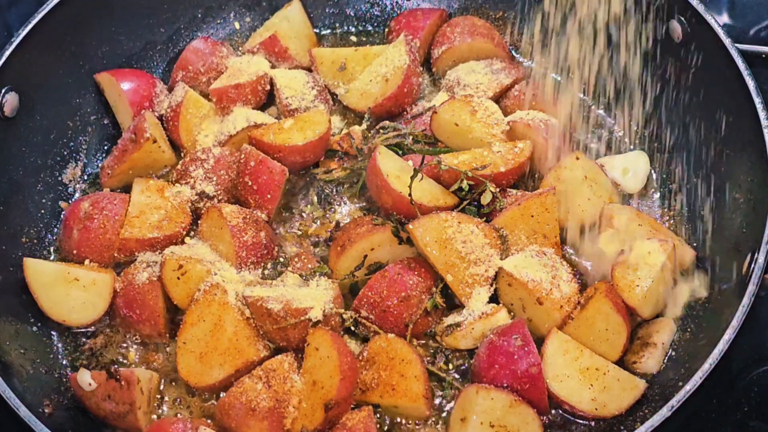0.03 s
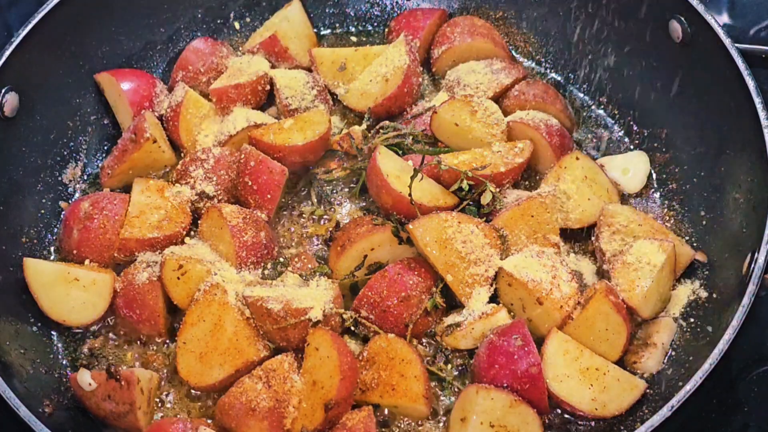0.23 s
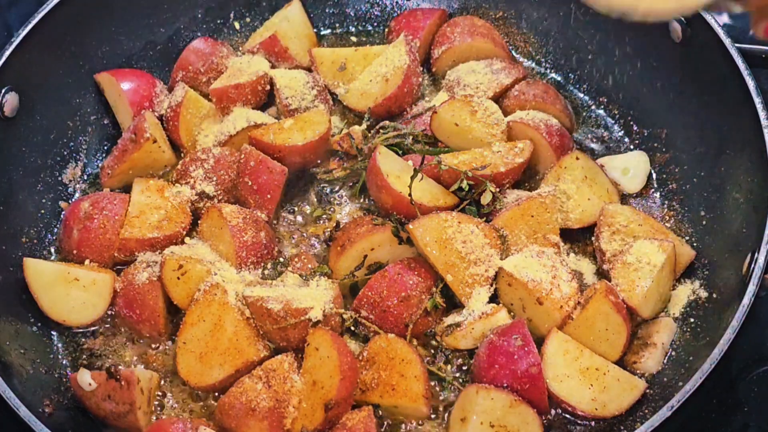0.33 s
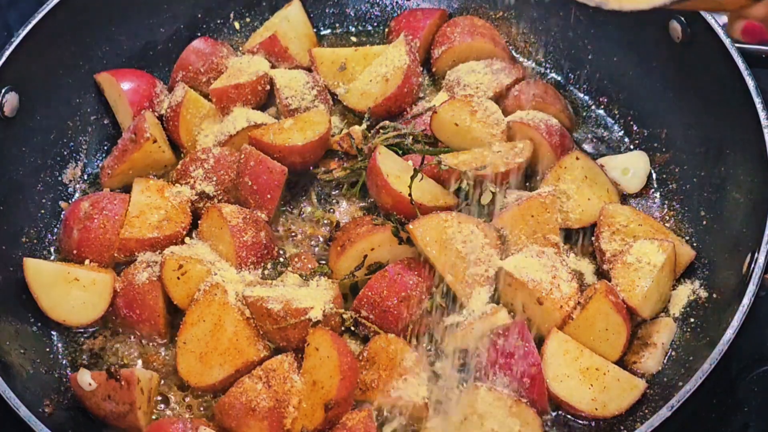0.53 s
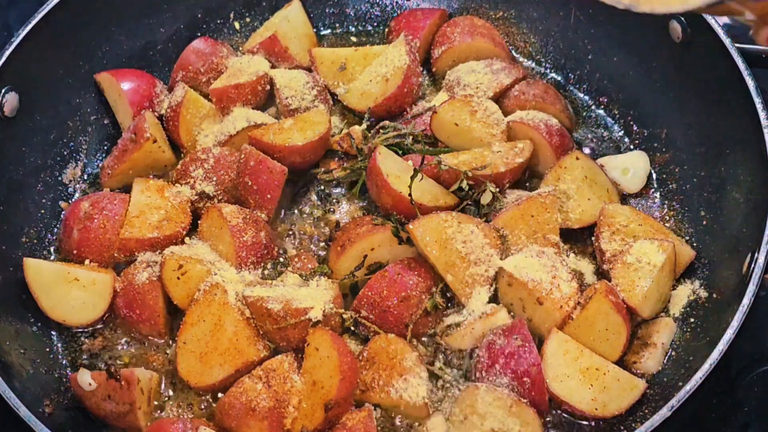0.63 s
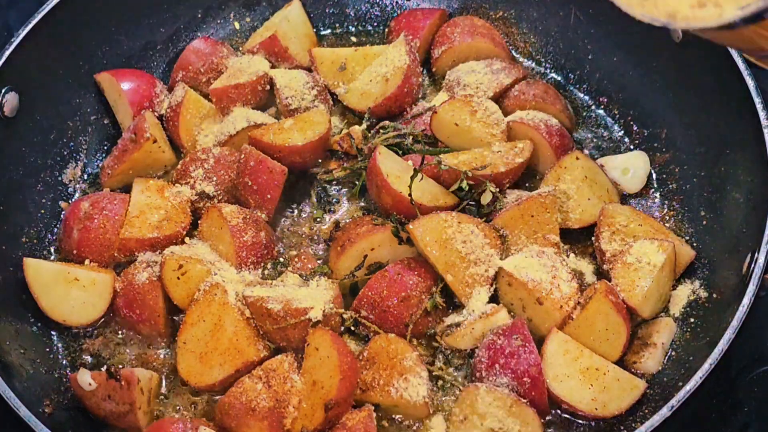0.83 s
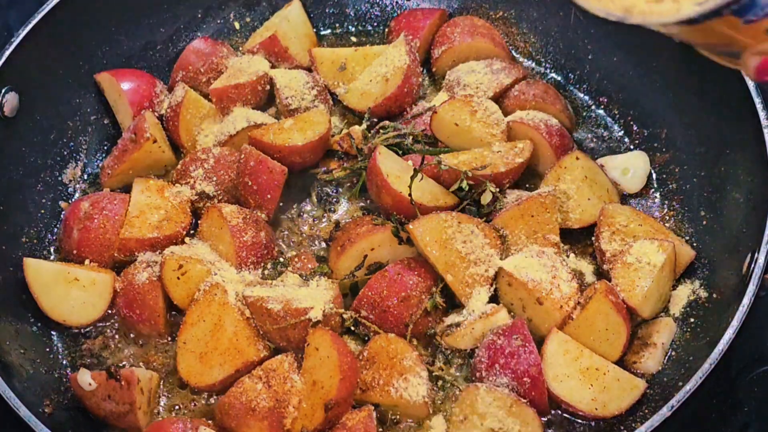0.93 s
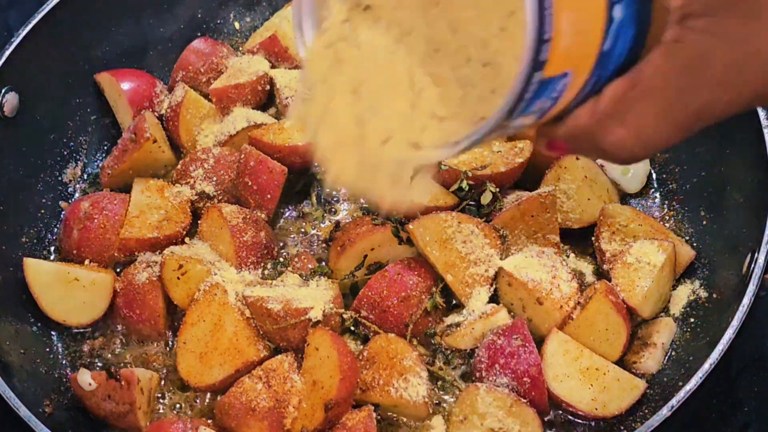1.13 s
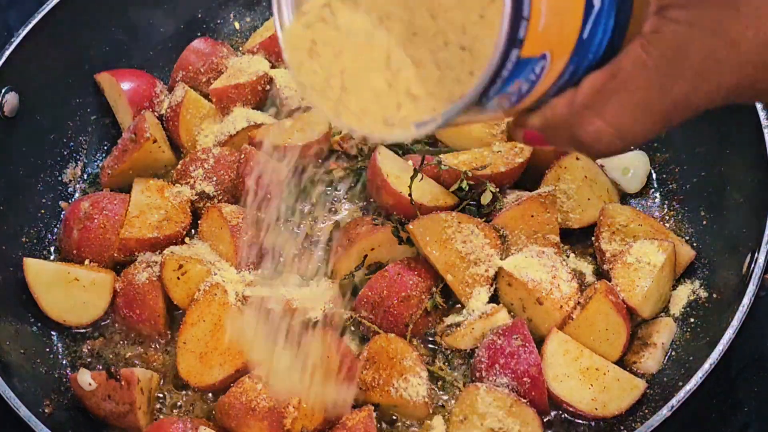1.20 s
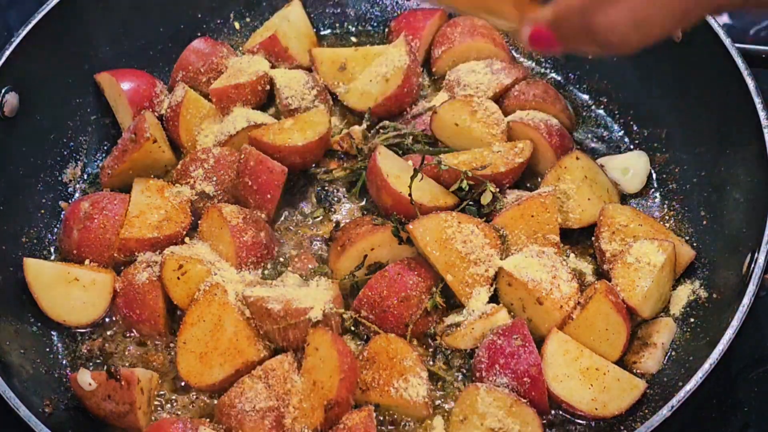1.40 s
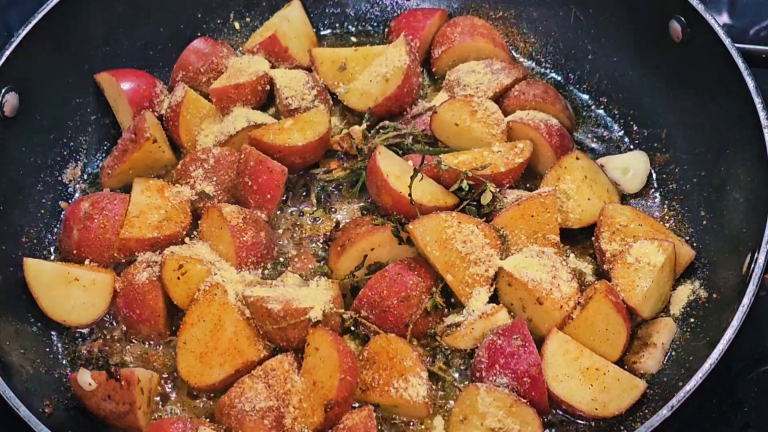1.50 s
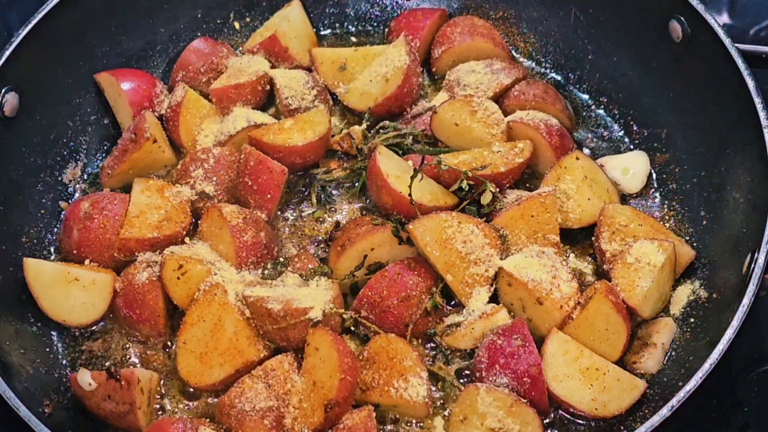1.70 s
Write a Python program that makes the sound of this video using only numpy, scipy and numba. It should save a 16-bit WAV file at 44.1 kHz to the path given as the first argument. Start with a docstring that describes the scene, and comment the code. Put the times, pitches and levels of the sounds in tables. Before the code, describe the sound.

A canister of dry seasoning gets a sharp shake, then rustling, rattling grains in a small kitchen

```python
"""A canister of granular seasoning is shaken close by in a small kitchen: a hard shake, then rattling.
The shake slams the load into the canister and rings its modes, and a weaker knock follows. Sliding
grains are clumped impact noise through steady and drifting resonances; ticks and bumps are short
bursts of filtered noise. A dense decaying noise tail gives the room, over faint tone and a low drone."""
import sys
import numpy as np
from scipy import signal
from scipy.fft import rfft, irfft, next_fast_len
from scipy.io import wavfile
from numba import njit

SR = 44100
rng = np.random.default_rng(int(sys.argv[2]) if len(sys.argv) > 2 else 0)


def store_pcm(level_fs):
    """Save levels as 16-bit WAV."""
    pcm = np.round(np.clip(level_fs, -1, 1) * 32767).astype(np.int16)
    wavfile.write(sys.argv[1], SR, np.atleast_2d(pcm).T)


N = 77175
T = np.arange(N) / SR
SIZE = 2 * next_fast_len(N // 2 + 4096)  # padded FFT length
FREQ_HZ = np.maximum(np.fft.rfftfreq(SIZE, 1 / SR), 1)

# Room tone. Each row: centre in Hz, width in Hz, relative level in dB.
ROOM_TONE = [(301, 59, 4.5), (470, 50, 1), (920, 1000, -9)]
# Low drone. Each row: centre in Hz, width in Hz, relative level in dB.
DRONE = [(101, 11, -1), (137, 50, -12.5), (59, 49, -18)]
# Dull bumps of the hand and the shifting load.
# Each row: peak in seconds, nominal rise and fall in seconds, centre in Hz, level in dB.
BUMPS = [(0.246, 0.013, 0.041, 125, -35.5), (.24, 0.0094, 0.043, 380, -27), (0.313, 0.05, 0.04, 310, -30),
         (.33, 0.023, .02, 146, -40), (0.529, 0.023, 0.047, 100, -36), (.68, 0.034, 0.023, 83, -43),
         (.93, 0.026, .02, 104, -49.5), (1.07, 0.0098, 0.038, 97, -44), (1.088, 0.041, 0.036, 285, -43.5),
         (1.22, 0.012, 0.025, 119, -46), (1.293, 0.016, 0.047, 148, -37), (1.4, 0.022, 0.031, 170, -49),
         (1.51, 0.089, 0.079, 105.5, -47), (1.745, 0.026, .03, 111, -40.5)]
# Single hard grains. Each row: start in seconds, level in dB before TICK_TRIM_DB, brightness in Hz.
TICKS = [(0.0373, -13, 10000), (0.109, -2, 11000), (0.114, -11, 10100), (0.176, -20, 6050),
         (0.2134, 9, 9500), (.5465, -16, 4500), (.5585, -4, 4100), (0.677, 2, 4800), (0.6953, -2, 4470),
         (0.732, -2, 3000), (1.079, -3, 8900), (1.15, 2, 9500), (1.307, -4.5, 9050)]
# Load slams into the canister, then slumps back.
# Each row: start in seconds, level in dB, treble roll-off in Hz.
KNOCKS = [(0.2134, -9, 5000), (.279, -19, 1320)]
# Modes of the knocked canister. Each row: frequency in Hz, relative level in dB.
MODES = [(308, -11.5), (460, -9.5), (492, -13), (751, 1), (818, -4), (954, -4), (1161, 3), (1320, -5.5),
         (1699, 1.5), (1788, -19), (1960, -10), (2115, -16), (2234, -8), (2368, -3.5), (2432, -9.5),
         (3033, -9)]
# Slides of the load. Each row: peak in seconds, nominal rise and fall in seconds, then drive in dB
# of hollow, cavity, rasp, scrape, wall, sizzle, hiss, air.
SLIDES = [ (0.019, 0.13, 0.019, -38.5, -27, -39, -38.5, -38, -28, -31, -49),
          (0.073, 0.02, 0.1, -35, -27.5, -35, -30, -21.5, -21, -31.5, -44),
          (0.114, 0.011, 0.041, -38, -22.5, -30.5, -27.5, -37, -19.5, -29.5, -32),
          (.18, .01, 0.075, -55, -28, -45, -25, -40, -31, -40, -42),
          (0.221, 0.007, 0.032, -4, 6, 0, -9, -17, -5, -6, -22.5),
          (0.298, 0.022, 0.041, -9, -7.5, -6.5, -25.5, -11.5, -21, -23, -39),
          (.40, 0.049, 0.049, -21, -13.5, -33, -32, -21.5, -47, -30, -65),
          (0.497, 0.049, 0.033, -11, -3.5, -16, -35.5, -21.5, -26.5, -33, -46),
          (0.563, 0.017, 0.036, -19, -5.5, -8.5, -22, -11.5, -21.5, -26, -41),
          (0.641, 0.047, 0.04, -18, -11, -15, -21, -13, -23, -29, -41),
          (.69, 0.016, 0.054, -16.5, -9, -12, -16, -14, -21.5, -21, -41),
          (0.832, 0.14, 0.16, -27.5, -17, -21, -28.5, -31, -27, -26.5, -43),
          (.98, 0.057, 0.023, -24, -9.5, -23, -50, -45, -15, -35, -44),
          (1.098, 0.091, 0.094, -20, -8.5, -13.5, -21.5, -41, -9, -14.5, -26),
          (1.206, 0.028, 0.026, -20, -11, -29, -27.5, -22, -15.5, -20.5, -21.5),
          (1.265, 0.035, 0.027, -42, -11, -37, -29.5, -26, -23, -28, -25),
          (1.311, 0.036, 0.046, -37, -11, -37.5, -28.5, -18, -13, -30, -32),
          (1.44, .07, 0.064, -37.5, -10, -35.5, -37, -22.5, -17.5, -44, -36),
          (1.518, 0.037, 0.067, -28.5, -6, -21, -37.5, -28, -12.5, -36, -36),
          (1.619, 0.051, 0.098, -23.5, -8.5, -21.5, -39, -52, -26, -27, -36),
          (1.74, 0.057, .05, -21, -12, -14, -32, -51, -21.5, -30, -29)]
# Steady resonances excited by the grains, by register.
# Each row: centre in Hz, width in Hz, relative level in dB.
HOLLOW_MODES = [(525, 93, -5.5), (642, 92, -10), (750, 36.7, 4.5), (941, 72, 1), (1185, 250, -11)]
RASP_MODES = [(2128, 165, -1), (2460, 280, -5.5), (2904, 320, -3)]
SCRAPE_MODES = [(3910, 500, 1), (4840, 810, 1), (5640, 1060, -2.5), (6200, 340, -2.5)]
HISS_MODES = [(7790, 970, -0.5), (9000, 850, 0.5), (11300, 530, -7)]
AIR_MODES = [(12940, 3100, 0.81), (13700, 910, -1.6)]
# Narrow steady resonances, chiefly near 1.7 kHz, singing under the rattle.
# Each row: centre in Hz, width in Hz, relative level in dB.
SINGING_RESONANCES = [(1699, 39.2, -1), (1593, 35, -7), (975, 60, -20)]
# Resonances drifting as the canister tilts and the load shifts.
# Each row: time in seconds, cavity centre in Hz, wall centre in Hz, sizzle centre in Hz.
TILT_DRIFT = [(0, 1750, 4180, 10200), (.14, 1766, 4160, 10250), (.26, 1688, 4290, 9460),
              (.5, 1700, 4140, 9970), (0.554, 1650, 4050, 9640), (0.599, 1670, 5260, 9630),
              (0.782, 1708, 5060, 9060), (1.1, 1602, 4950, 9460), (1.27, 1614, 4650, 9520),
              (1.34, 1605, 4990, 9000), (1.44, 1472, 5230, 9530), (1.53, 1670, 5070, 9300),
              (1.75, 1526, 5070, 9500)]
# Air space above the load, changing as it pours.
# Each row: time in seconds, hollow centre in Hz, rasp centre in Hz.
AIR_SPACE_DRIFT = [(0, 726, 2590), (.17, 704, 2680), (.23, 810, 2290), (.3, 840, 2110), (.45, 654, 2050),
                   (0.501, 720, 2190), (.57, 530, 2160), (.66, 634, 2240), (0.718, 664, 2640),
                   (.82, 540, 2620), (.98, 730, 2680), (1.1, 566, 2920), (1.23, 560, 3000),
                   (1.42, 700, 2280), (1.541, 630, 2000), (1.62, 790, 2800), (1.75, 620, 2980)]

ROOM_TONE_DB, DRONE_DB, DRONE_START_S = -60, -54.5, 0.181
ROOM_T60_S, ROOM_DB, ROOM_GAP_S = 0.098, -10.5, 0.0032
BUMP_WIDTH_RATIO = 0.42  # share of the centre frequency
TICK_DECAY_S, TICK_TRIM_DB = 0.0016, -3  # decay to 1/e
TICK_WIDTH_RATIO, TICK_TOP_HZ = 0.38, 11000  # width as a share of the brightness
RING_T60_S, RING_SLOPE = 0.175, 0.4  # T60 at 1 kHz, shorter for higher modes
KNOCK_RISE_CYCLES = 7.7
CHATTER_PER_S, CHATTER_DB = 120, 5.5  # loose grains make the ring uneven
GRAINS_PER_S, GRAIN_SPREAD_DB, DUST_DB = 5700, 3.0, -3  # dust: finest powder under the grains
CLUMPS_PER_S, CLUMP_DB = 170, 1.5
STEADY_DB = -4.5  # steady hollow and rasp under the drifting ones
SINGING_DB = -3
CAVITY_WIDTH_HZ, WALL_WIDTH_HZ, SIZZLE_WIDTH_HZ = 230, 430, 1140
HOLLOW_WIDTH_HZ, RASP_WIDTH_HZ = 229, 417
TOP_HZ = 15700


def amp(db):
    """Decibels to gain."""
    return 10 ** (np.asarray(db) / 20)


def unit(x):
    """Scale to standard deviation 1."""
    return x / np.std(x)


def noise():
    """White noise over the whole scene."""
    return rng.standard_normal(N)


def flutter(rate_per_s):
    """Random wobble: straight lines between random values drawn at the given rate."""
    return np.interp(T * rate_per_s, np.arange(N), noise())


def swell(peak_s, rise_s, fall_s, power=1.96):
    """Near-Gaussian envelope that rises to a peak and dies away."""
    spread_s = np.where(T < peak_s, max(rise_s, 0.002) * 0.8, max(fall_s, 0.002) * 0.85)
    return np.exp(-0.5 * (np.abs(T - peak_s) / spread_s) ** power)


def resonances(rows):
    """Gain over FREQ_HZ of a set of steep-sided resonances, summed in power."""
    power = 0
    for hz, width_hz, db in rows:
        detune = (FREQ_HZ - hz * hz / FREQ_HZ) / (2 * width_hz) * np.sqrt(2)
        power = power + (amp(db) / (1 + detune ** 2)) ** 2
    return np.sqrt(power)


def shape(x, gain):
    """Causal minimum-phase filter with the given gain over FREQ_HZ."""
    cepstrum = np.fft.irfft(np.log(gain + 1e-6), SIZE)
    # fold onto positive time
    cepstrum[1:SIZE // 2] *= 2
    cepstrum[SIZE // 2 + 1:] = 0
    return irfft(rfft(x, SIZE) * np.exp(rfft(cepstrum)), SIZE)[:N]


@njit
def band(x, hz, width_hz):
    """State-variable band-pass whose centre may move; unity gain at the centre."""
    y, band_state, low_state = np.empty(len(x)), 0., 0.
    for i in range(len(x)):
        g = np.tan(np.pi * hz[i] / SR)
        damping = width_hz / hz[i]
        v = (band_state + g * (x[i] - low_state)) / (1 + g * (g + damping))
        band_state = 2 * v - band_state
        low_state += 2 * g * v
        y[i] = damping * v
    return y


def drifting(x, times_s, track_hz, width_hz):
    """Two equal band-passes in series whose centre follows a curve."""
    hz = np.interp(T, times_s, track_hz)
    once = band(x, hz, float(width_hz))
    return band(once, hz, float(width_hz))


def background():
    """Faint resonant noise as room tone, joined by a low drone of gated noise."""
    tone = unit(shape(noise(), resonances(ROOM_TONE)))
    drone = unit(shape(noise() * (T > DRONE_START_S), resonances(DRONE)))
    return amp(ROOM_TONE_DB) * tone + amp(DRONE_DB) * drone


def kitchen(x):
    """Short, dense reflections from worktop and walls: a decaying noise tail."""
    tail = noise() * amp(-60 * T / ROOM_T60_S) * (T > ROOM_GAP_S)
    reflections = signal.fftconvolve(x, tail / np.linalg.norm(tail))[:N]
    return x + amp(ROOM_DB) * reflections


def bumps():
    """Low, short rumbles of band noise as the canister is swung and stopped."""
    out = np.zeros(N)
    for peak_s, rise_s, fall_s, hz, db in BUMPS:
        rumble = unit(shape(noise(), resonances([(hz, BUMP_WIDTH_RATIO * hz, 0)])))
        out += amp(db) * swell(peak_s, rise_s, fall_s, power=2.2) * rumble
    return out


def ticks():
    """Coarse grains click against the wall: decaying noise through one broad resonance."""
    out = np.zeros(N)
    top_cut = np.hypot(1, (FREQ_HZ / TICK_TOP_HZ) ** 10)
    for start_s, db, hz in TICKS:
        click = noise() * (T >= start_s) * np.exp(-np.abs(T - start_s) / TICK_DECAY_S)
        gain = resonances([(hz, TICK_WIDTH_RATIO * hz, 0)]) / top_cut
        out += amp(db + TICK_TRIM_DB) * shape(click, gain)
    return out


def knocks():
    """The load lands as a soft mass and rings the canister's modes; low ones build up more slowly."""
    out = np.zeros(N)
    for start_s, db, dull_hz in KNOCKS:
        age_s = np.maximum(T - start_s, 0)
        for (hz, mode_db), phase in zip(MODES, rng.random(len(MODES))):
            t60_s = RING_T60_S * (1000 / hz) ** RING_SLOPE
            buildup = 1 - np.exp(-age_s * hz / KNOCK_RISE_CYCLES)
            softness = np.hypot(1, (hz / dull_hz) ** 2)
            push = amp(db + CHATTER_DB * flutter(CHATTER_PER_S)) * buildup / softness
            decay = amp(mode_db - 60 * age_s / t60_s)
            out += push * decay * np.sin(2 * np.pi * (hz * age_s + phase))
    return out


def grains():
    """Dense impacts of random sign and uneven size over fine dust."""
    struck = rng.random(N) < GRAINS_PER_S / SR
    sign = rng.choice([-1, 1], N)
    size = amp(GRAIN_SPREAD_DB * np.minimum(rng.exponential(size=N), 6))
    return unit(unit(struck * sign * size) + amp(DUST_DB) * noise())


def slides():
    """Clumps of grains slide along the wall and excite steady and drifting resonances."""
    clumps = amp(CLUMP_DB * flutter(CLUMPS_PER_S))
    power = 0
    for peak_s, rise_s, fall_s, *register_db in SLIDES:
        power = power + np.outer(amp(register_db), swell(peak_s, rise_s, fall_s)) ** 2
    drives = [np.sqrt(p) * unit(grains() * clumps) for p in power]
    hollow, cavity, rasp, scrape, wall, sizzle, hiss, air = drives

    out = shape(scrape, resonances(SCRAPE_MODES))
    out += shape(hiss, resonances(HISS_MODES))
    out += shape(air, resonances(AIR_MODES))
    out += amp(STEADY_DB) * shape(hollow, resonances(HOLLOW_MODES))
    out += amp(STEADY_DB) * shape(rasp, resonances(RASP_MODES))
    out += amp(SINGING_DB) * shape(cavity, resonances(SINGING_RESONANCES))

    times_s, cavity_hz, wall_hz, sizzle_hz = np.array(TILT_DRIFT).T
    out += drifting(cavity, times_s, cavity_hz, CAVITY_WIDTH_HZ)
    out += drifting(wall, times_s, wall_hz, WALL_WIDTH_HZ)
    out += drifting(sizzle, times_s, sizzle_hz, SIZZLE_WIDTH_HZ)

    times_s, hollow_hz, rasp_hz = np.array(AIR_SPACE_DRIFT).T
    out += drifting(hollow, times_s, hollow_hz, HOLLOW_WIDTH_HZ)
    out += drifting(rasp, times_s, rasp_hz, RASP_WIDTH_HZ)
    return out


def scene():
    """The canister in the kitchen, over the background; one channel."""
    canister = slides() + knocks() + ticks() + bumps()
    return (kitchen(canister) + background())[None]


def record(dry):
    """The recorder rounds the loudest peaks and cuts the deep bass and the top."""
    rounded = np.tanh(0.75 * dry) / 0.85
    bass_cut = signal.butter(2, 42, "high", fs=SR, output="sos")
    top_cut = signal.ellip(10, 0.2, 80, TOP_HZ, fs=SR, output="sos")
    return signal.sosfilt(top_cut, signal.sosfilt(bass_cut, rounded))


dry = scene()
out = record(dry)
store_pcm(out)
```